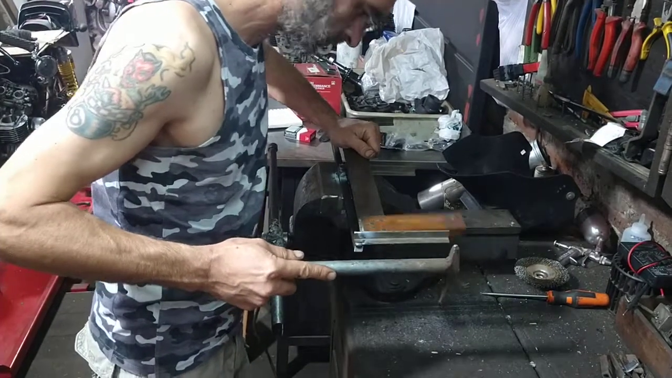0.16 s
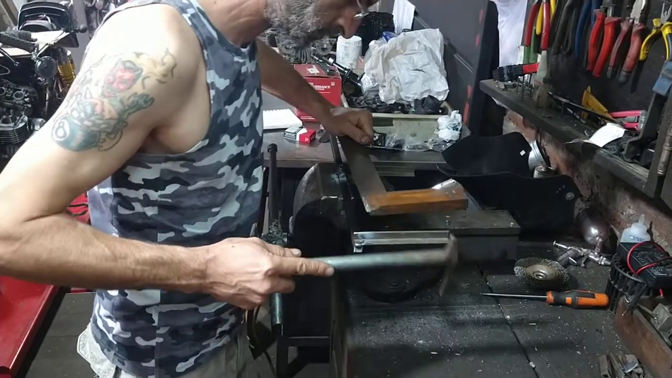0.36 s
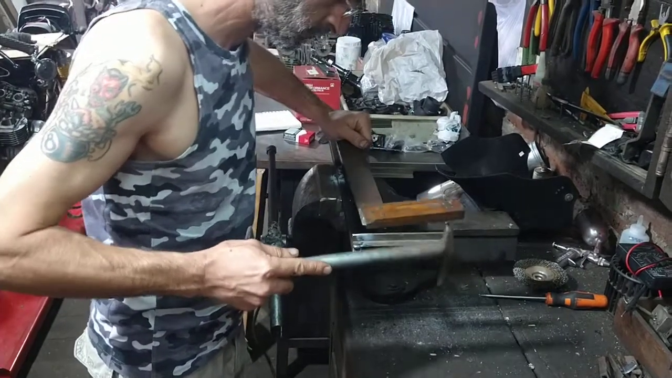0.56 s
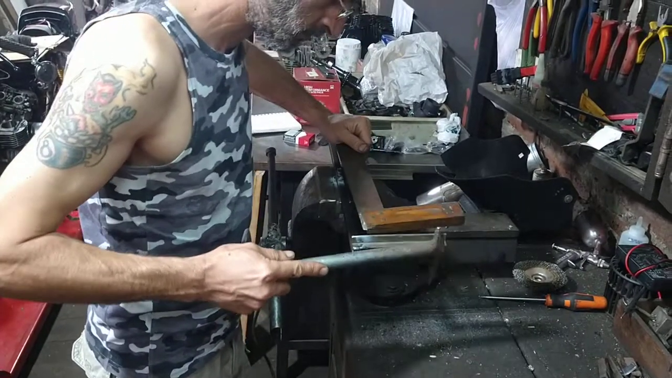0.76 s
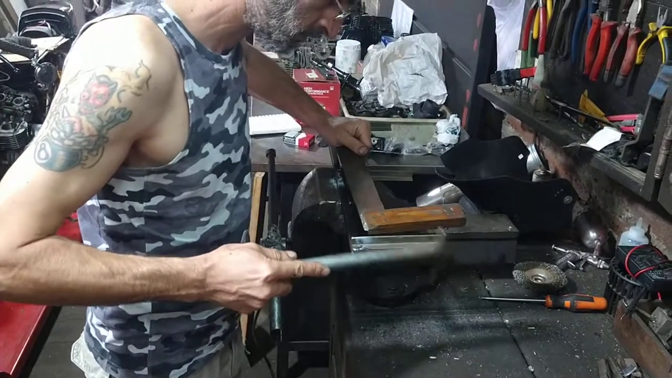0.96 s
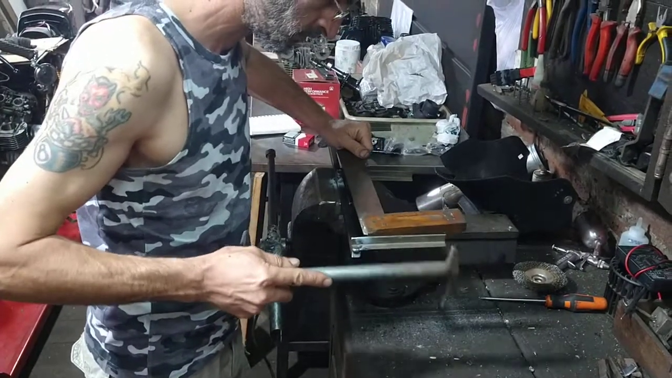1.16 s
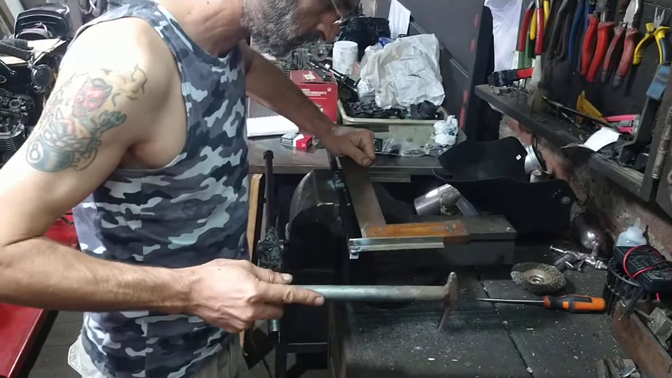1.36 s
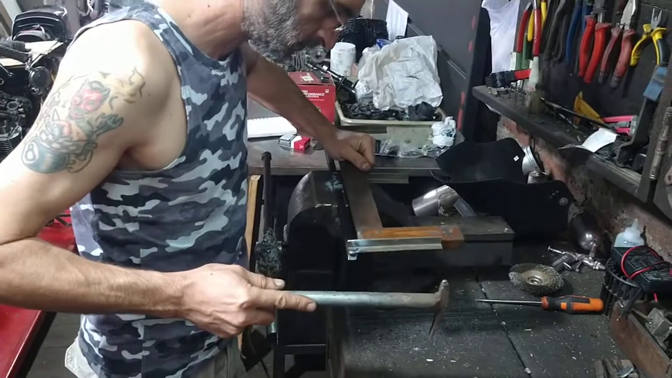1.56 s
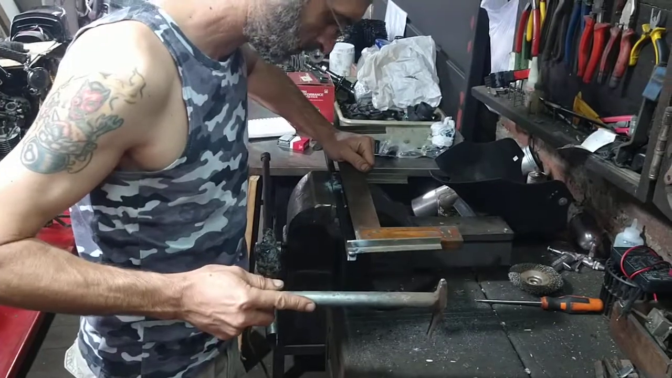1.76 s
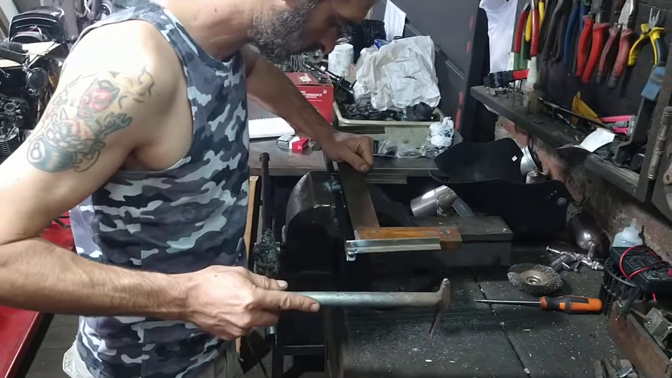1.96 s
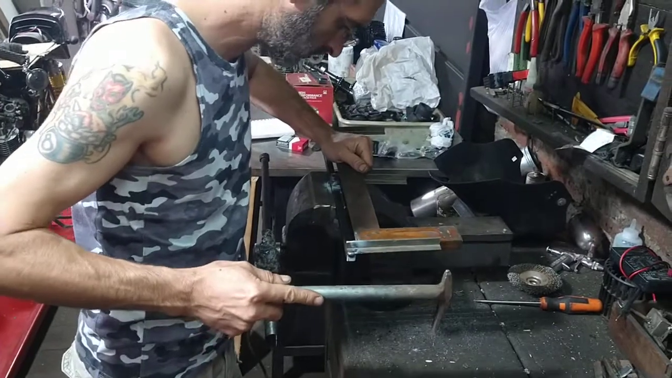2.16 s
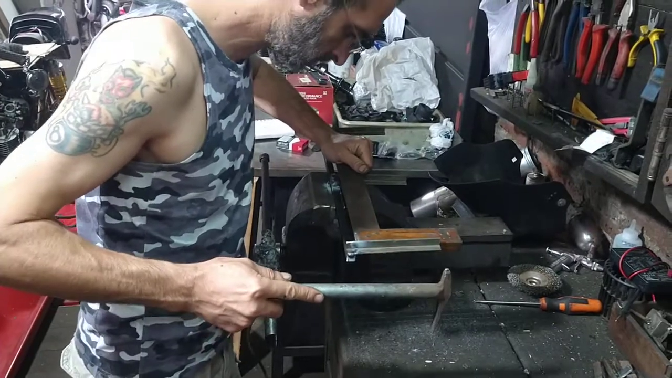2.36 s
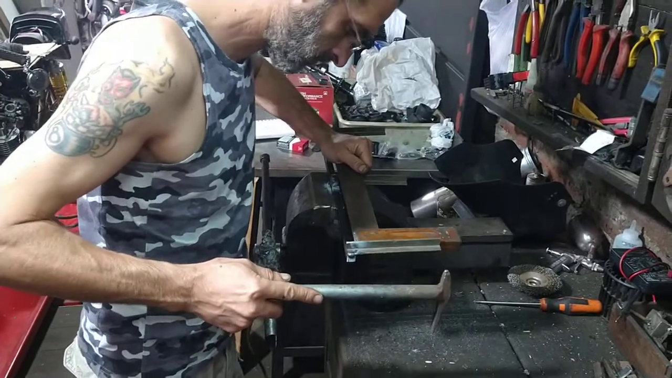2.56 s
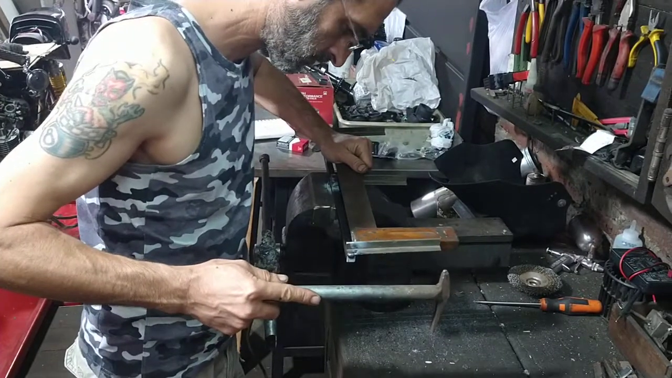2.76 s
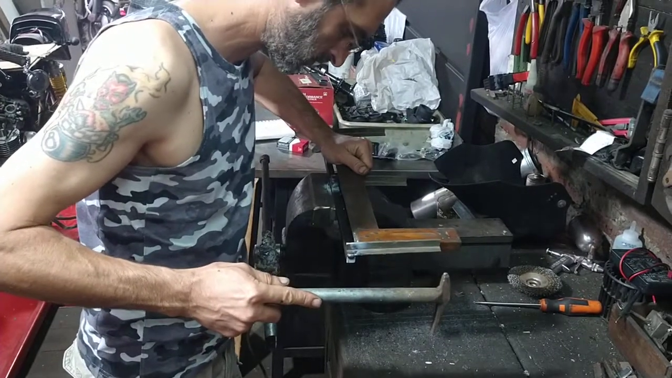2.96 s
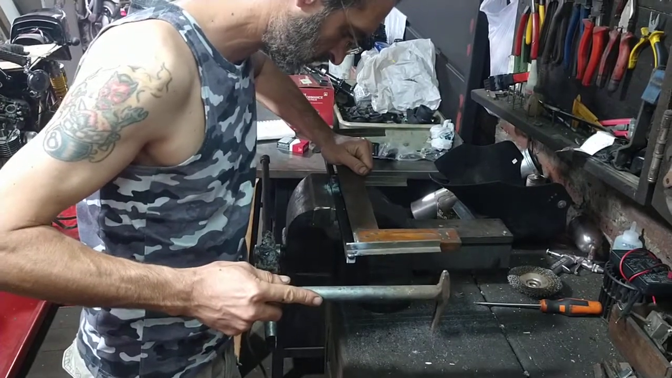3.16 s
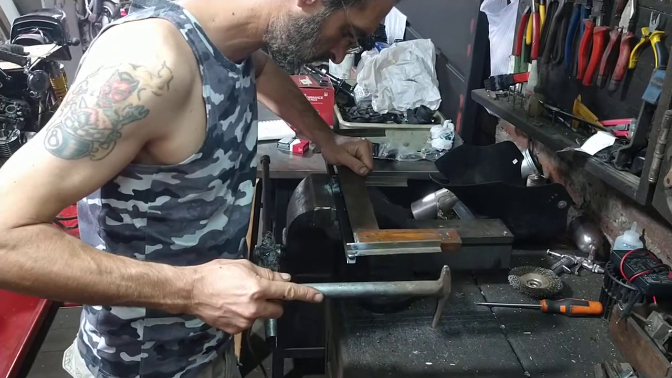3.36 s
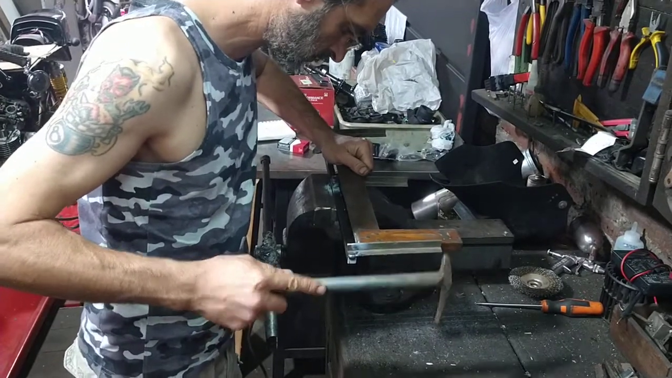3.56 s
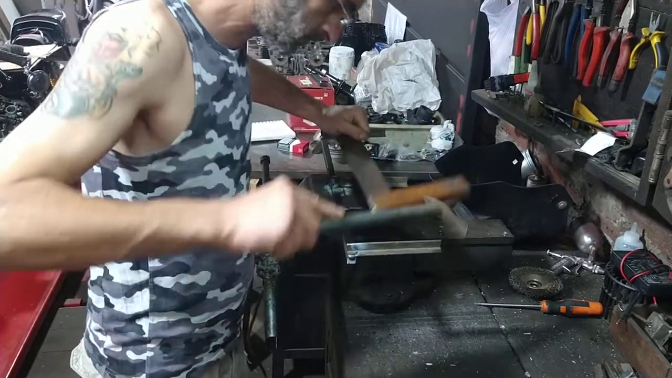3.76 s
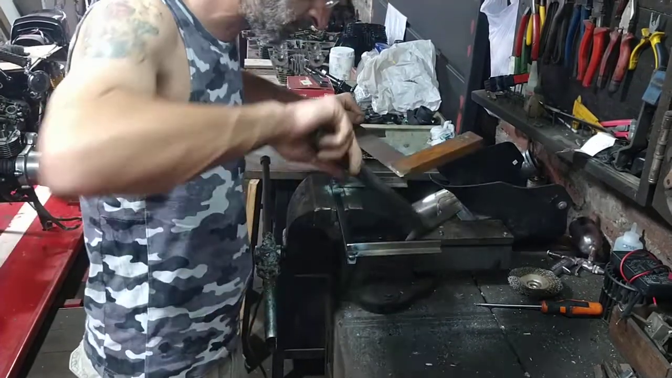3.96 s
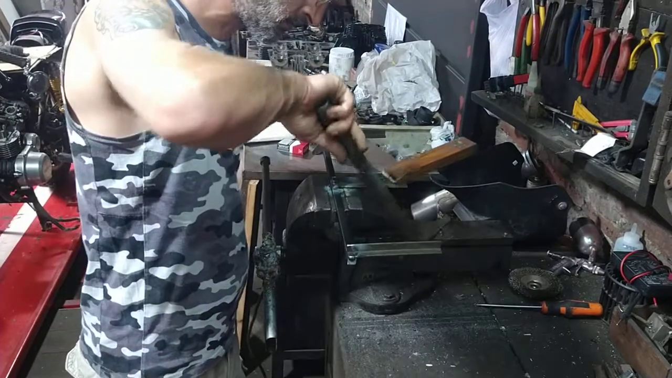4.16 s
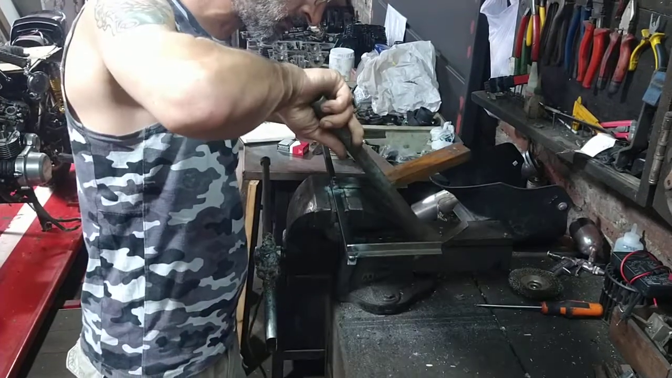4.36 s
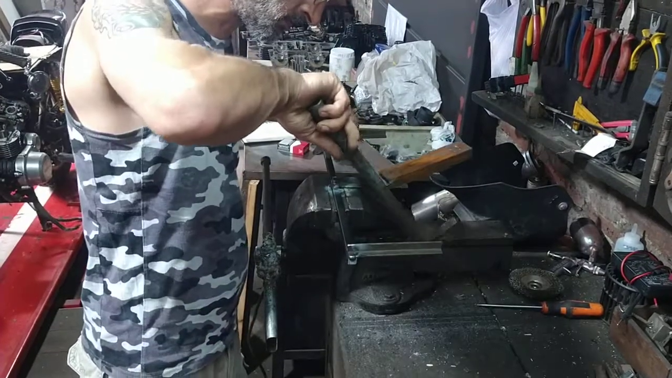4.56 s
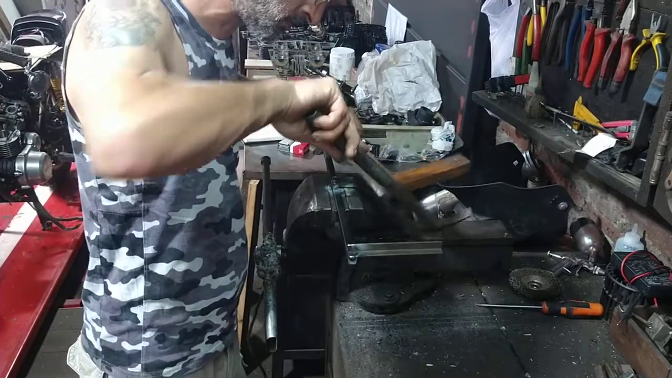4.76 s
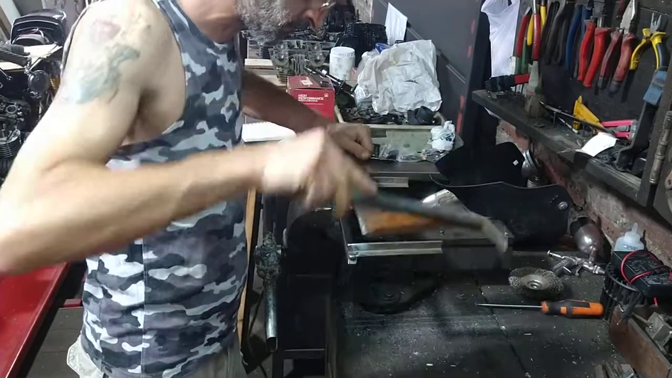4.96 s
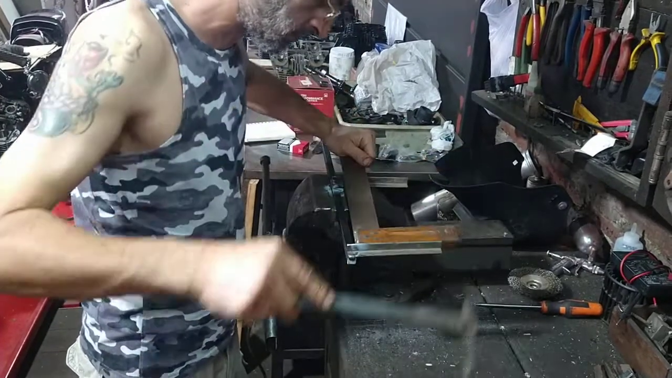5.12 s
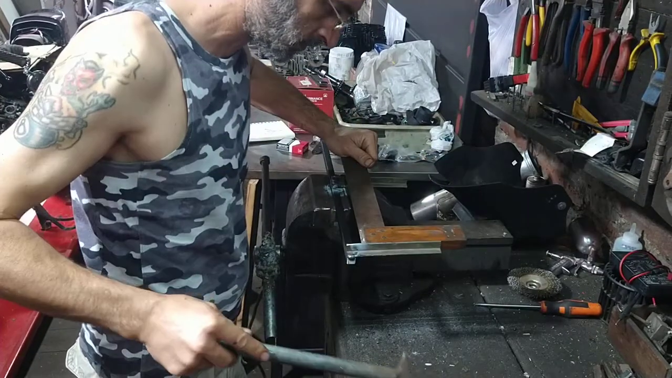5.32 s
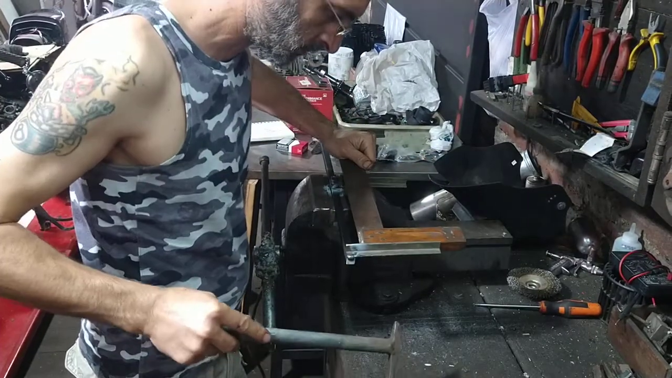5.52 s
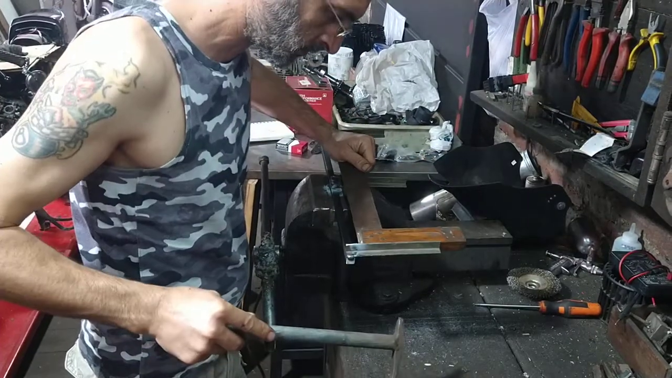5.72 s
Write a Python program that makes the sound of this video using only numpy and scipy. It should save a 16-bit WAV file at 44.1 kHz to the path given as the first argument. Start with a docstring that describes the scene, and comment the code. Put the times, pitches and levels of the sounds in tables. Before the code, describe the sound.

In a softly humming garage, three sharp metallic hammer blows, a pause, a dull knock, two quick ringing steel clanks, and a closing clunk.

```python
"""Steel frame at a garage bench vise

A welded angle-iron frame in a bench vise, in a small garage with a humming machine: three hammer taps on
the clamped frame, a knock as it is lifted out, two clanks while loose, a clunk as it goes back into the vise.
Blows are decaying noise plus fluttering steel modes; each shakes the bench in proportion to its strength.
Air and hum are filtered noise, the bench is low sines, and a noise suppressor follows the microphones."""
import sys
import numpy as np
from scipy import signal
from scipy.fft import rfft, irfft
from scipy.io import wavfile
from scipy.ndimage import uniform_filter1d, minimum_filter1d

SR = 44100
rng = np.random.default_rng(int(sys.argv[2]) if len(sys.argv) > 2 else 0)


def log_audio(samples):
    """Write samples as a 16-bit WAV file to the path given in sys.argv[1]."""
    # one column per channel
    frames = np.atleast_2d(samples).T
    # limit to full scale, then quantise
    limited = np.clip(frames, -1, 1)
    pcm = np.round(limited * 32767).astype(np.int16)
    wavfile.write(sys.argv[1], SR, pcm)


N = 259749
RING = int(1.5 * SR)  # samples kept of each blow
AGE = np.arange(RING) / SR  # seconds since the blow


def amp(db):
    """Decibels to gain."""
    return 10 ** (np.asarray(db) / 20)


def read(points, hz):
    """A table of (Hz, value) joined by lines on a log-frequency axis."""
    f, value = np.transpose(points)
    return np.interp(np.log(hz + 1), np.log(f + 1), value)


def freqs(x):
    """Frequencies of the spectrum of x."""
    return np.fft.rfftfreq(x.shape[-1], 1 / SR)


def shaped(x, gain):
    """Filters x by a gain for each frequency."""
    return irfft(rfft(x) * gain, x.shape[-1])


def bell(hz, centre_hz, width_hz):
    """Resonance curve: one at its centre, half at one width to either side."""
    return 1 / (1 + ((hz - centre_hz) / width_hz) ** 2)


def rms(x):
    """Root mean square."""
    return np.sqrt(np.mean(x ** 2) + 1e-20)


def strength(x):
    """RMS over the first 80 ms of a blow."""
    return rms(x[..., :int(.08 * SR)])


def add(mix, s, sound):
    """Mixes a stereo sound in at time s."""
    part = mix[:, max(round(s * SR), 0):][:, :sound.shape[1]]
    part += sound[:, :part.shape[1]]


def diffuse(size):
    """White noise at two microphones: alike in the bass, nearly unrelated in the treble."""
    # Likeness of the two microphones. Each row: frequency in Hz, left-right correlation.
    likeness = [(100, 0.92), (250, 0.92), (500, 0.64), (1000, 0.05), (3000, 0.044), (12000, .15)]
    a, b = rng.standard_normal((2, size))
    same = np.clip(read(likeness, freqs(a)), -1, 1)
    right = shaped(a, same) + shaped(b, np.sqrt(1 - same ** 2))
    return np.array([a, right])


def garage(low_cut_hz=28, waver_db=2.9, wavers_per_s=5, air_db=-53):
    """Steady air noise whose hiss wavers a little, and a machine's hum made of narrow noise bands."""
    # Colour of the air in the garage. Each row: frequency in Hz, relative level in dB per Hz.
    air_colour = [(15, -62), (25, -27.5), (70, -14), (102, -1), (130, -18), (185, -10), (335, -17.5),
                  (405, -16.5), (545, -13.5), (695, -14.5), (1370, -19), (2410, -18.5), (3340, -21),
                  (8360, -19), (16000, -37)]
    # Hum of the machine. Each row: centre in Hz, half-width in Hz, level in dB.
    hum_lines = [(105.2, 4.3, -64), (283, 15, -65), (405.7, 11, -67), (1645, 34, -68.5)]
    air = diffuse(N)
    hz = freqs(air)
    low_cut = hz ** 2 / (hz ** 2 + low_cut_hz ** 2)
    air = shaped(air, amp(read(air_colour, hz)) * low_cut)
    knots = rng.standard_normal(size=64)
    drift_db = waver_db * np.interp(np.arange(N) / SR * wavers_per_s, np.arange(len(knots)), knots)
    hiss = shaped(air, 1 - bell(hz, 0, 4000))
    air = air + (amp(drift_db) - 1) * hiss
    out = amp(air_db) * air / rms(air)
    drive = diffuse(N)
    for centre, width, db in hum_lines:
        line = shaped(drive, bell(hz, centre, width))
        out += amp(db) * line / rms(line)
    return out


def sway(modes, rise_s):
    """Low modes that take a moment to build up and reach the two microphones slightly apart."""
    out = np.zeros((2, RING))
    for hz, db, t60 in modes:
        age = AGE + .0002 * rng.standard_normal((2, 1))  # arrival at each microphone
        detuned_hz = hz * rng.normal(1, 0.02)
        out += amp(db - 60 * AGE / t60) * np.sin(2 * np.pi * (detuned_hz * age + rng.random()))
    out = out * (1 - np.exp(-AGE / rise_s))
    return out / strength(out)


def jolt(boom_db, knock_db):
    """The bench top knocks almost at once; the boom of the heavy bench builds up more slowly."""
    # Modes of the heavy bench. Each row: nominal frequency in Hz, relative level in dB, t60 in s.
    boom_modes = [(49.5, -24, 1), (73.3, -13.5, .8), (90.8, -14, .9), (94.4, -1, 0.79), (111.6, -3, 0.7)]
    # Modes of the bench top. Each row: nominal frequency in Hz, relative level in dB, t60 in s.
    knock_modes = [(150.6, -10, 0.94), (181, 4, 0.46), (203, -1, .6), (218.4, -6, 0.92), (254.6, -12, 1)]
    boom = amp(boom_db) * sway(boom_modes, rise_s=0.036)
    return boom + amp(knock_db) * sway(knock_modes, rise_s=0.0023)


def bench():
    """Dull bumps of the handled work, which shake the bench without ringing the steel."""
    # Each row: start in seconds, boom of the bench in dB, knock of its top in dB.
    bumps = [(0.229, -77, -59.5), (1.29, -49.5, -56), (1.535, -56, -51), (3.071, -62.5, -62),
             (5.444, -46, -51.5), (5.71, -53, -61)]
    out = np.zeros((2, N))
    for s, boom_db, knock_db in bumps:
        add(out, s, jolt(boom_db, knock_db))
    return out


def clash(spectrum, modes, crack_db=-1, crack_s=0.0063, body_db=9, body_hz=1700,
          cluster_db=6, cluster_hz=45, lumpy_db=2.5):
    """Dense modes, clustered round the strong ones, and room echoes: a crack, then each band dies at its own speed."""
    # Decay of the crowd of weak modes. Each row: frequency in Hz, t60 in s.
    band_decay = [(150, 0.94), (500, 0.93), (1000, 0.67), (1900, 0.47), (2800, 0.45), (3900, 0.37),
                  (5500, 0.37), (7700, 0.3), (11000, 0.3)]
    noise = diffuse(RING)
    hz = freqs(noise)
    clusters = sum(amp(db) * bell(hz, centre, cluster_hz) for centre, db, _ in modes)
    cluster_gain = np.sqrt(1 + amp(cluster_db) * clusters)
    knots = np.arange(0, SR / 2, 90)  # Hz
    lumps_db = lumpy_db * np.interp(hz, knots, rng.standard_normal(len(knots)))
    low_cut = hz / np.hypot(hz, 90)
    noise = shaped(noise, amp(read(spectrum, hz) + lumps_db) * cluster_gain * low_cut)
    centres, t60s = np.transpose(band_decay)
    out = np.zeros((2, RING))
    for pick, centre, t60 in zip(np.eye(len(t60s)), centres, t60s):
        # the first push of the blow stands out more in the bass and mids than in the treble
        crack = amp(crack_db + body_db * bell(centre, 0, body_hz)) * np.exp(-AGE / crack_s)
        band = shaped(noise, read(np.c_[centres, pick], hz))
        out += band * (amp(-60 * AGE / t60) + crack)
    return out / strength(out)


def ringing(modes, scatter=0.58, flutter_per_s=110):
    """Clear steel modes; echoes off the walls make each one flutter differently at each microphone."""
    out, age = np.zeros((2, RING)), AGE[:RING // 2]
    for hz, db, t60 in modes:
        for ear in out:
            real, imag = rng.standard_normal((2, 256))
            echoes = np.interp(age * flutter_per_s, np.arange(len(real)), real + 1j * imag)
            carrier = np.exp(2j * np.pi * (hz * age + rng.random()))
            tone = ((1 + scatter * echoes) * carrier).real
            ear[:len(age)] += amp(db - 60 * age / t60) * tone / strength(tone)
    return out / strength(out)


def blow(row, modes, spectrum, ring_db, rise_s, favour_width_hz=150, bass_hz=500, pivot_hz=3000):
    """Steel meets steel and rebounds once; hardness sets the brightness, the spot struck favours some modes."""
    _, level_db, brightness_db, delay, rebound_db, favoured_hz, lift_db = row
    sound = clash(spectrum, modes)
    hz = freqs(sound)
    struck = [(f, db + lift_db * bell(f, favoured_hz, favour_width_hz), t60) for f, db, t60 in modes]
    # the crowd of weak modes is lifted half as much as the clear ones
    sound = shaped(sound, amp(.5 * lift_db * bell(hz, favoured_hz, favour_width_hz)))
    sound = sound + amp(ring_db) * ringing(struck)
    # the tilt levels off in the bass
    octaves = np.log2(np.hypot(hz, bass_hz) / pivot_hz)
    sound = shaped(sound, amp(brightness_db * octaves))
    fade = np.minimum(2 * (AGE[-1] - AGE), 1) ** 2  # over the last half second
    sound = sound * (1 - np.exp(-AGE / rise_s)) * fade
    add(sound, delay, amp(rebound_db) * sound.copy())
    return amp(level_db) * sound / strength(sound)


def steel(blows, modes, spectrum, ring_db, rise_s, boom_db, knock_db):
    """All the blows on one piece of steel; a fixed share of each goes down into the bench."""
    out = np.zeros((2, N))
    for row in blows:
        s, level_db = row[:2]
        struck = blow(row, modes, spectrum, ring_db, rise_s)
        add(out, s, struck + amp(level_db) * jolt(boom_db, knock_db))
    return out


# In the four sources below, columns are as follows.
# Blows, each row: start in seconds, level in dB, brightness in dB per octave, rebound delay in s,
# rebound in dB, frequency the striking point favours in Hz, its lift in dB.
# Modes, each row: frequency in Hz, relative level in dB, t60 in s.
# Crowd of weaker modes, each row: frequency in Hz, relative level in dB per Hz.
def lift_out():
    """A faint knock on the vise jaw as the frame is lifted out."""
    # The blow on the jaw, its ringing modes and its crowd, columns as above.
    nudges = [(3.73, -41.5, -2.4, .017, -21, 2270, 2)]
    jaw_modes = [(1384, -4, .4), (1654, 0, .4), (2343, -1, .35), (2393, -4, .35), (2606, -4, .35),
                 (4262, -2, .35), (4650, -5, .3), (6150, -9, .2)]
    jaw_crowd = [(150, -30), (450, -6), (750, -10), (1100, -9), (1550, 0), (2000, 3), (2700, 3), (3400, -4),
                 (4500, 7), (5300, -4), (9000, -1.5), (15500, -16)]
    return steel(nudges, jaw_modes, jaw_crowd, ring_db=-5, rise_s=0.0014, boom_db=-16.5, knock_db=-5.5)


def put_back():
    """A clunk of two blows on the vise body as the frame goes back in."""
    # The blows on the vise body, its ringing modes and its crowd, columns as above.
    clunks = [(5.378, -29, 3, .033, -7.5, 4330, 7.3), (5.44, -39.5, -1.5, .029, -10, 290, 3)]
    vise_modes = [(1848, -14, 0.48), (2085, -8, 0.46), (2724, -10, 0.41), (3163, -15, 0.36),
                  (4417, -7, 0.28), (4622, 2, 0.3), (5090, -8, 0.27), (5740, -1, 0.27), (5830, -12, 0.27),
                  (7177, -10, 0.26), (7652, -7, 0.26), (8152, -12, 0.25), (8240, -9, 0.25),
                  (8609, -13, 0.25), (10407, -22, 0.23), (11441, -21, 0.23), (13375, -35, 0.23)]
    vise_crowd = [(90, -10), (150, 7.5), (280, -0.5), (480, 1), (780, -5.5), (1200, -1), (1650, -3.5),
                  (2700, -1.5), (3600, -2), (4600, -0.5), (6500, -6), (8500, -3), (10000, -13),
                  (15500, -30)]
    return steel(clunks, vise_modes, vise_crowd, ring_db=-3.0, rise_s=0.0028, boom_db=-25, knock_db=-25.5)


def loose_clanks():
    """Two clanks of the loose steel, the ring stronger than the clash."""
    # The blows on the loose steel, its ringing modes and its crowd, columns as above.
    clanks = [(4.4443, -23.5, -0.76, .02, -4.5, 6720, -21), (4.531, -25, -0.79, .03, -18, 6680, 13.5)]
    loose_modes = [(4660, -13, 0.27), (4988, -7, 0.27), (5261, -9, 0.27), (5301, -11, 0.27),
                   (6028, -5, 0.27), (6095, -3, 0.27), (6165, -9, 0.27), (6656, -8, 0.26), (6691, -3, 0.26),
                   (6739, 0, 0.26), (6784, -1, 0.26), (6821, 0, 0.26), (6869, -5, 0.26), (8172, -1, 0.25),
                   (8208, -5, 0.25), (8245, -5, 0.25), (8310, -3, 0.25), (8364, -7, 0.25),
                   (8620, -11, 0.25), (10423, -11, 0.23), (11375, -11, 0.23), (11440, -11, 0.23),
                   (11476, -7, 0.23), (11532, -15, 0.23)]
    loose_crowd = [(120, -12), (300, -25), (700, -14), (1150, -15), (1650, -0.5), (2100, -3), (2700, 3),
                   (3250, 2), (3600, -2.5), (5000, 2), (7000, 6), (9500, 0), (11500, 0.5), (12700, -25),
                   (15500, -30)]
    return steel(clanks, loose_modes, loose_crowd, ring_db=1.5, rise_s=0.0011, boom_db=-25.5, knock_db=-33.5)


def hammer_taps():
    """Three hammer taps on the clamped frame, the ring below the clash."""
    # The blows on the clamped frame, its ringing modes and its crowd, columns as above.
    taps = [(.5345, -23, 3, 0.033, -13.5, 8720, 19), (.8055, -24.5, 0.36, 0.047, -5, 1650, 8),
            (1.0862, -19, 2.5, .022, -6.5, 5210, 3.5)]
    frame_modes = [(650, -22, .9), (1790, -17, .45), (2335, -11, .4), (2702, -16, .36), (2795, -3, .38),
                   (2860, -11, .35), (2950, -15, .35), (4561, -11, .28), (5216, -8, .27), (5255, -6, .27),
                   (5299, -7, .27), (5561, -5, .27), (5626, -3, .27), (5691, -3, .27), (5990, -8, .27),
                   (6115, -8, .27), (6547, -7, .26), (6635, -7, .26), (7161, -10, .26), (7294, -8, .26),
                   (8717, -12, .23), (9196, -1, .23), (9242, -4, .23), (9296, 1, .23), (9360, -7, .23),
                   (10036, -10, .22), (11190, -13, .2), (11438, -12, .22), (13270, -19, .22)]
    frame_crowd = [(120, -19.5), (280, -14), (480, -19), (660, -14.5), (1100, -9), (1750, -3.5),
                   (2050, -10), (2330, -1), (2550, -3), (2850, 4.5), (3300, -8.5), (4000, -3), (5700, -1),
                   (9300, -0.5), (12400, -16), (14500, -18), (16000, -23)]
    return steel(taps, frame_modes, frame_crowd, ring_db=-3.5, rise_s=0.0023, boom_db=-21.5, knock_db=-22.5)


def scene():
    """Room, bench and steel together."""
    return garage() + bench() + lift_out() + put_back() + loose_clanks() + hammer_taps()


def dry_treble(x, split_hz=3100, depth_db=7, threshold_db=-47, knee_db=6):
    """The suppressor also follows the treble alone: it clamps the end of each ring and the hiss between blows."""
    treble = shaped(x, 1 / (1 + (split_hz / (freqs(x) + 1)) ** 20))
    power = abs(uniform_filter1d((treble ** 2).mean(0), size=700))
    level_db = 10 * np.log10(power + 1e-12)
    shut = .5 - .5 * np.tanh((level_db - threshold_db) / knee_db)
    return x + (amp(-depth_db * shut) - 1) * treble


def suppress(x, depth_db=3.5, threshold_db=-35, knee_db=2, hold_s=0.18):
    """A noise suppressor: turns everything down unless the treble has just been loud."""
    treble = shaped(x, freqs(x) > 2000)
    power = abs(uniform_filter1d((treble ** 2).mean(0), size=256))
    level_db = 10 * np.log10(power + 1e-12)
    half = max(int(hold_s * SR / 2), 1)
    held_db = -minimum_filter1d(-level_db, 2 * half + 1, origin=half)  # loudest of the last hold_s
    shut = .5 - .5 * np.tanh((held_db - threshold_db) / knee_db)
    return x * amp(-depth_db * uniform_filter1d(shut, size=256))


def record(dry, edge_hz=15750):
    """The right microphone hears more of the upper mids; then the suppressor and the band limit."""
    # Balance of the two microphones. Each row: frequency in Hz, left minus right in dB.
    balance = [(100, -.5), (600, 0.5), (1300, -2.5), (2400, -6.5), (4400, -3), (6500, -9), (8300, 0),
               (15000, 0)]
    ratio = amp(read(balance, freqs(dry)))
    gains = np.array([ratio, np.ones_like(ratio)]) / np.sqrt((1 + ratio ** 2) / 2)
    microphones = shaped(dry, gains)
    quieted = suppress(dry_treble(microphones))
    low_pass = signal.firwin(255, edge_hz, window=("kaiser", 8), fs=SR)
    return signal.oaconvolve(quieted, low_pass[None], "same")


dry = scene()
out = record(dry)
log_audio(out)
```